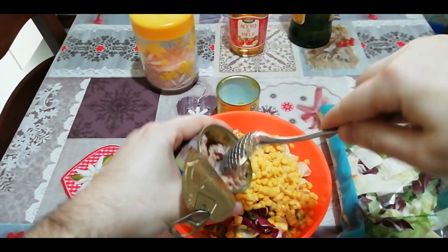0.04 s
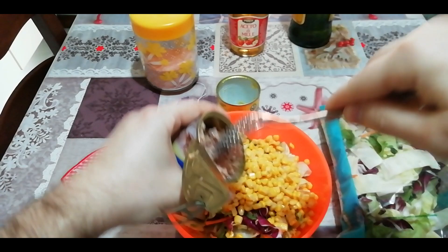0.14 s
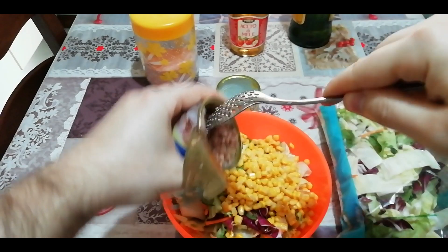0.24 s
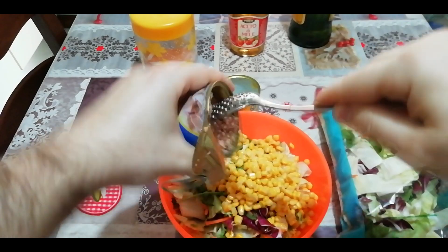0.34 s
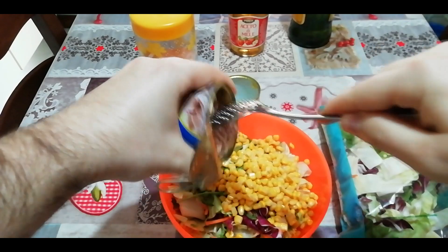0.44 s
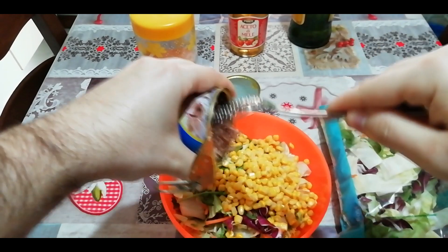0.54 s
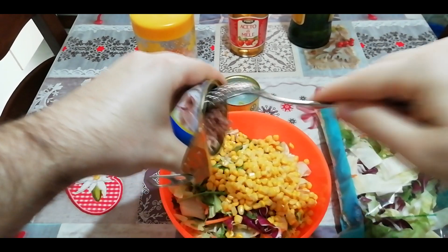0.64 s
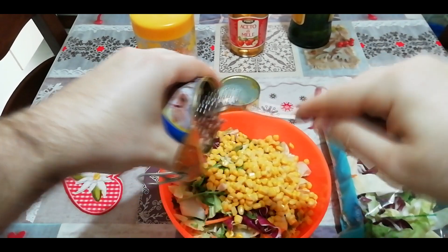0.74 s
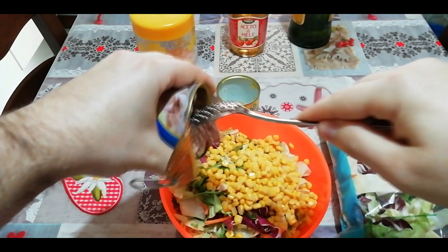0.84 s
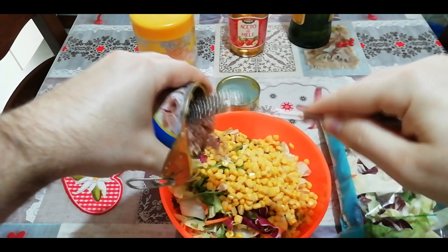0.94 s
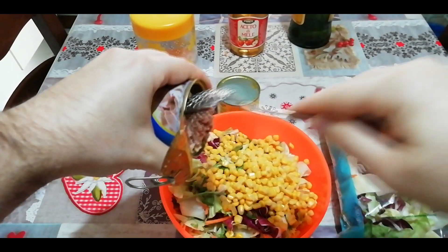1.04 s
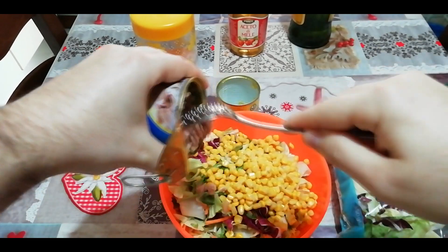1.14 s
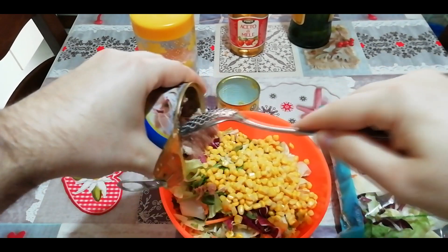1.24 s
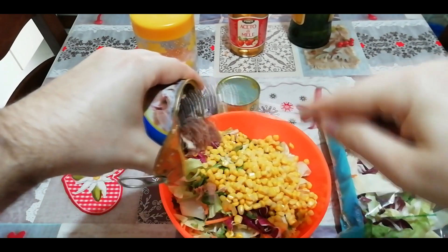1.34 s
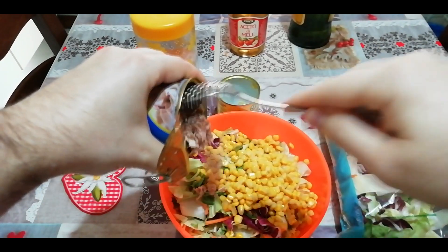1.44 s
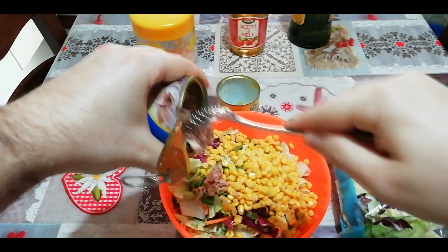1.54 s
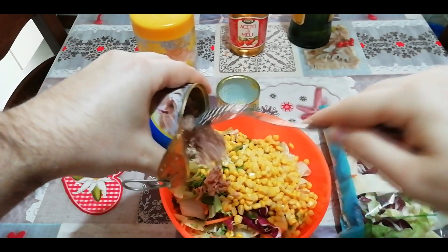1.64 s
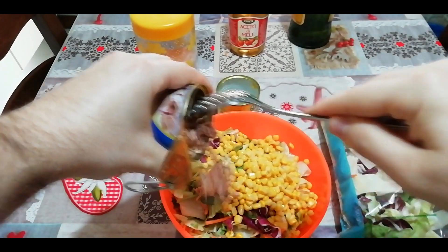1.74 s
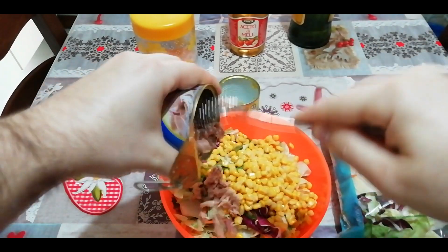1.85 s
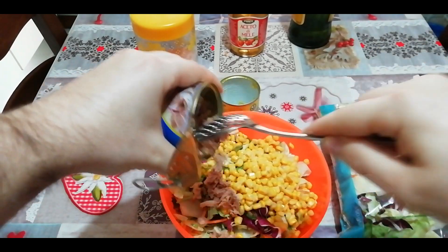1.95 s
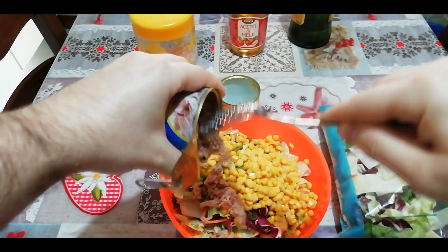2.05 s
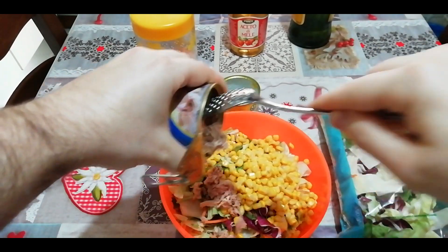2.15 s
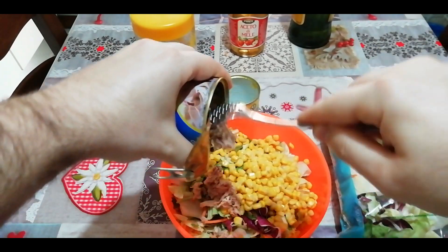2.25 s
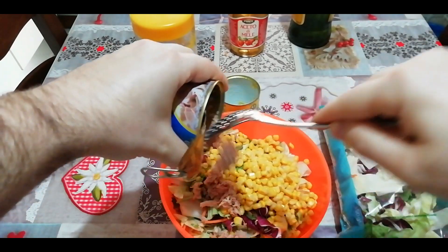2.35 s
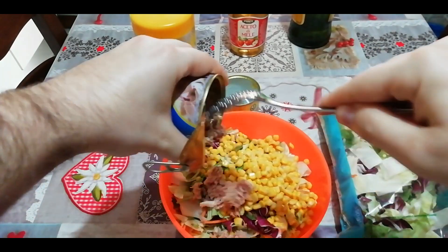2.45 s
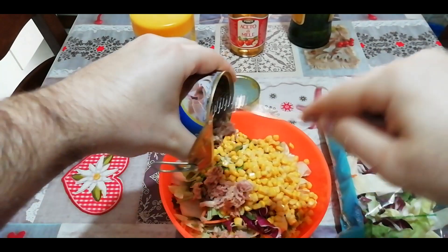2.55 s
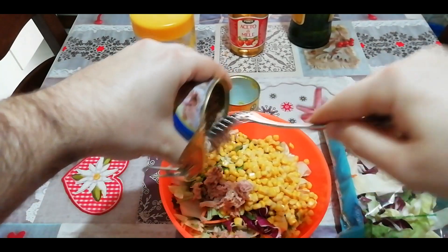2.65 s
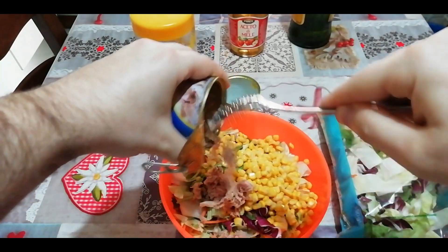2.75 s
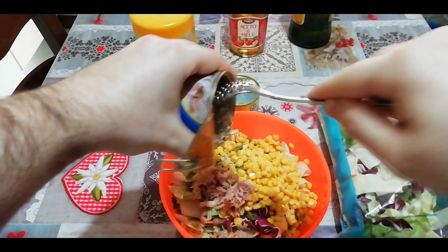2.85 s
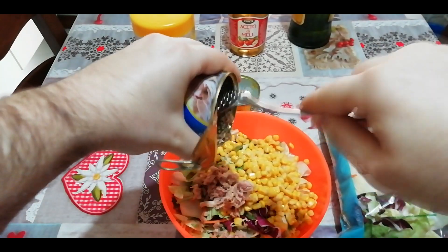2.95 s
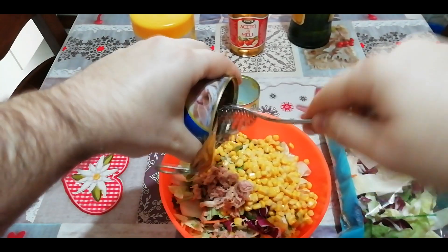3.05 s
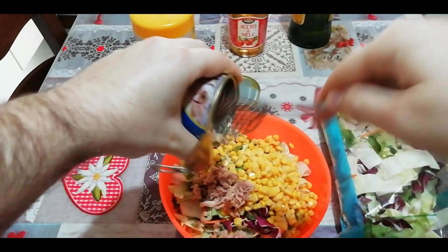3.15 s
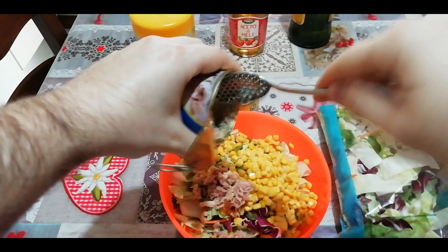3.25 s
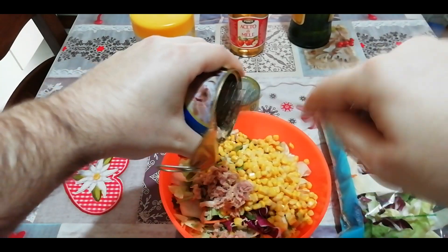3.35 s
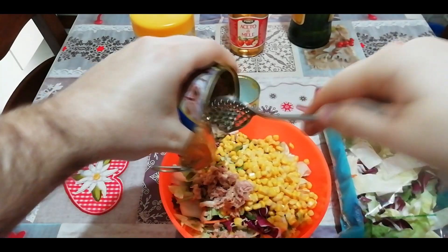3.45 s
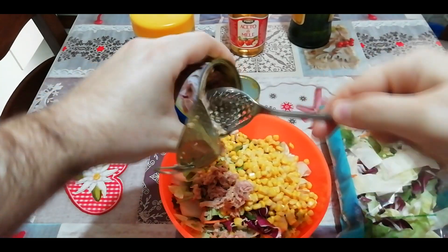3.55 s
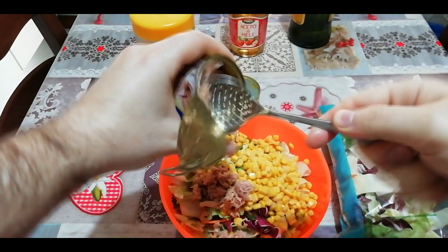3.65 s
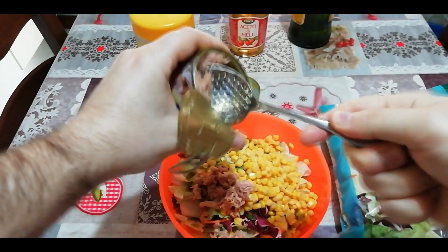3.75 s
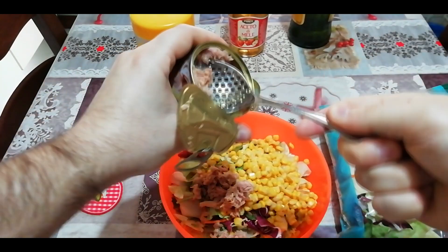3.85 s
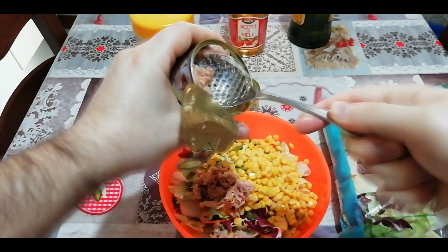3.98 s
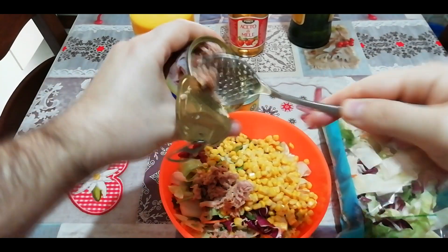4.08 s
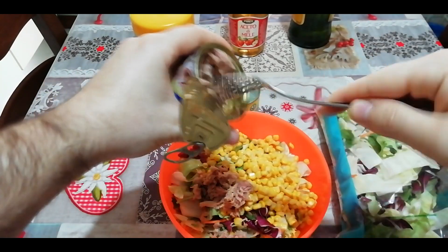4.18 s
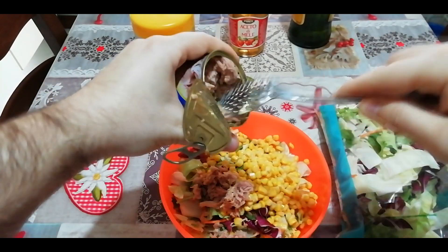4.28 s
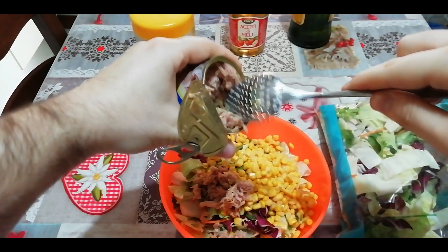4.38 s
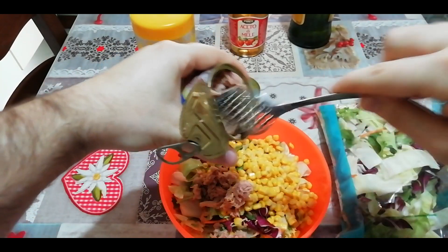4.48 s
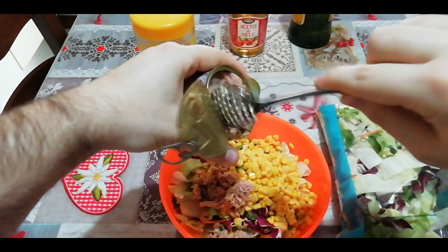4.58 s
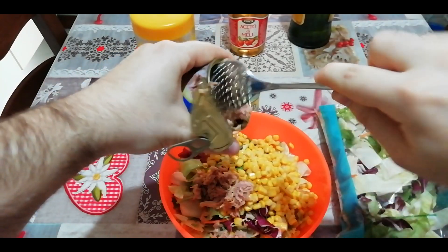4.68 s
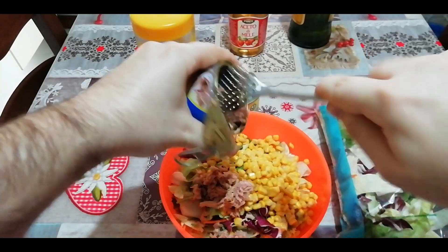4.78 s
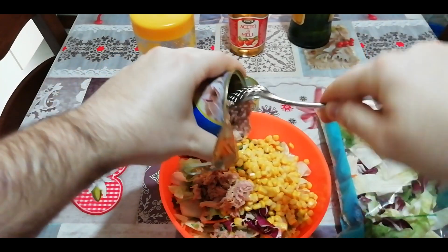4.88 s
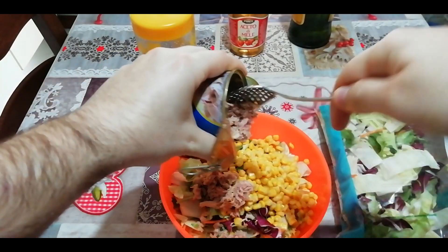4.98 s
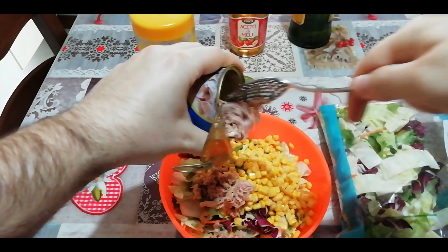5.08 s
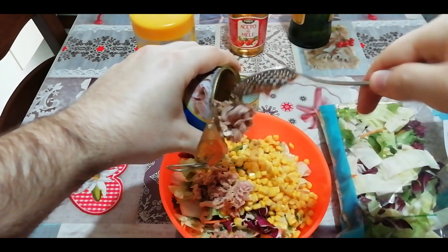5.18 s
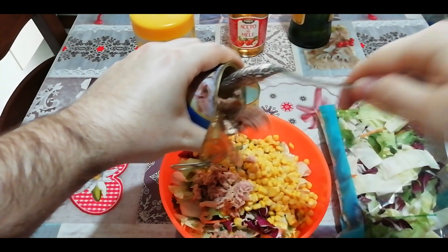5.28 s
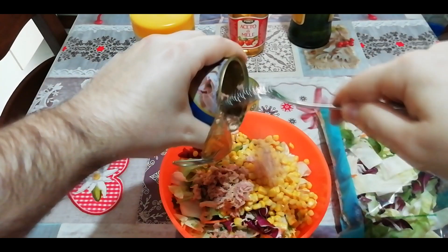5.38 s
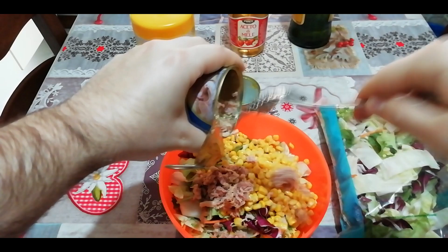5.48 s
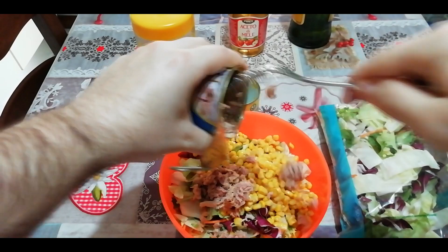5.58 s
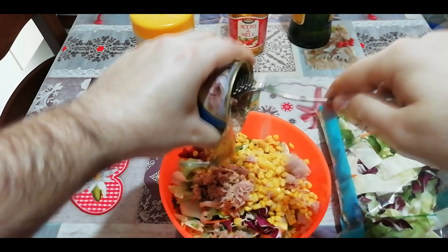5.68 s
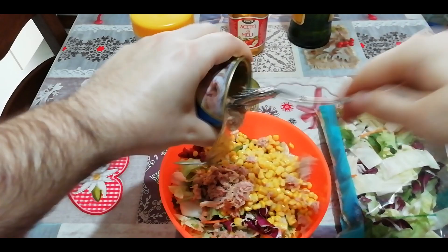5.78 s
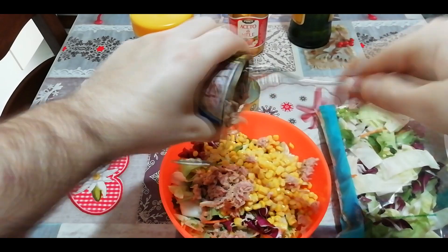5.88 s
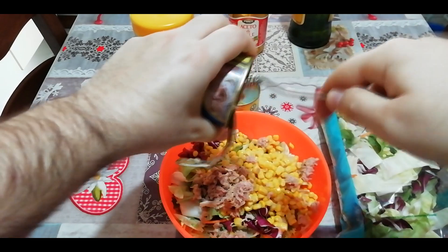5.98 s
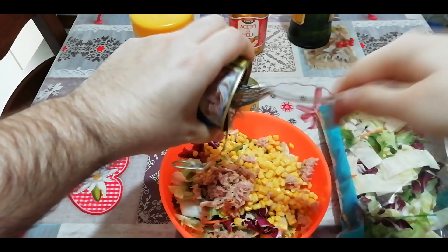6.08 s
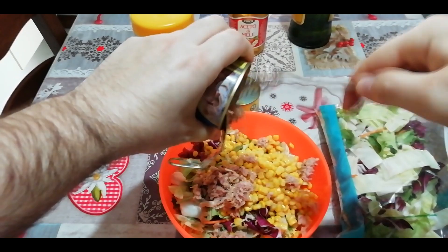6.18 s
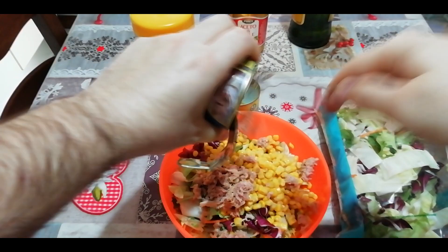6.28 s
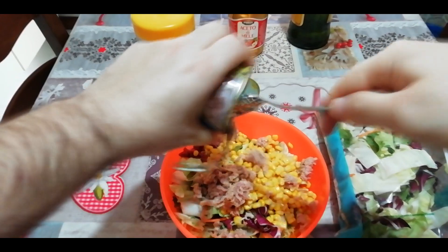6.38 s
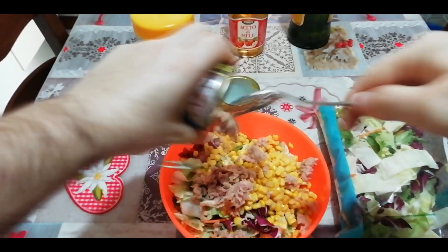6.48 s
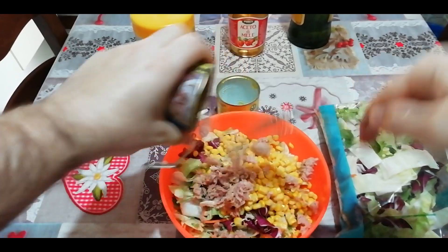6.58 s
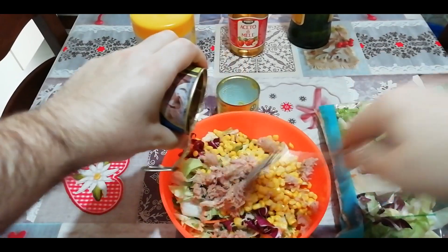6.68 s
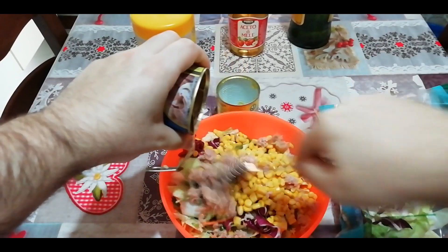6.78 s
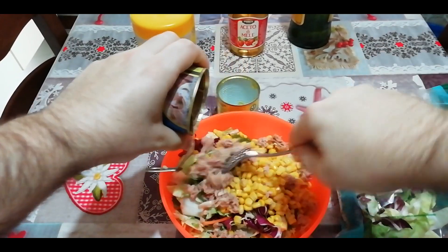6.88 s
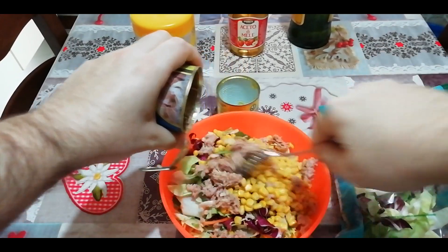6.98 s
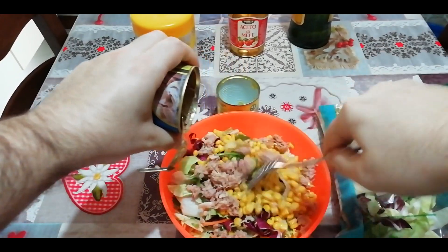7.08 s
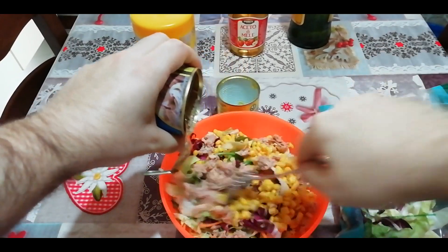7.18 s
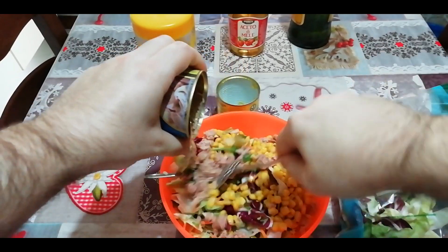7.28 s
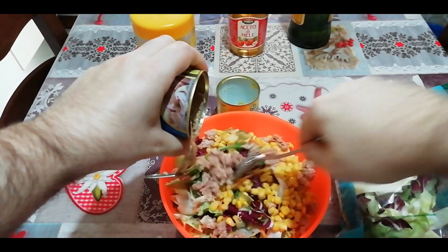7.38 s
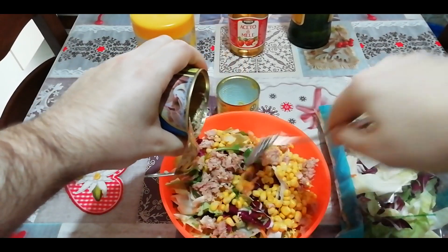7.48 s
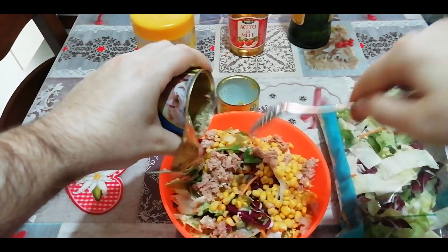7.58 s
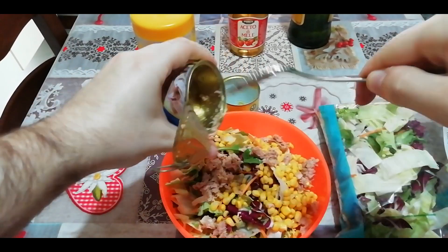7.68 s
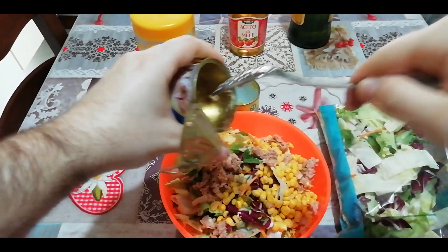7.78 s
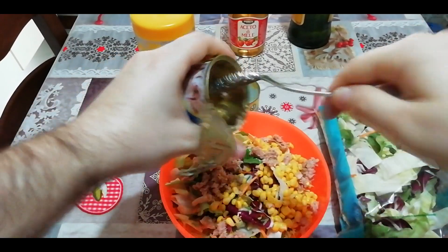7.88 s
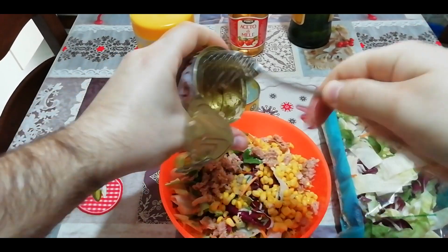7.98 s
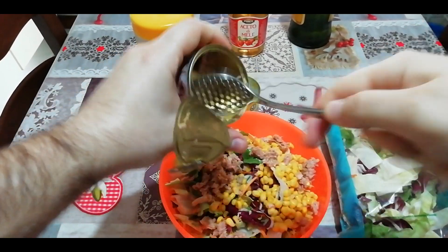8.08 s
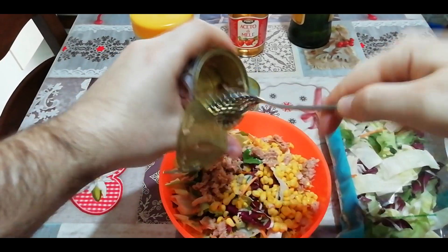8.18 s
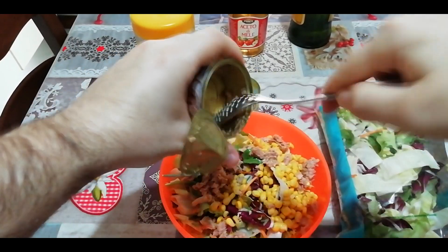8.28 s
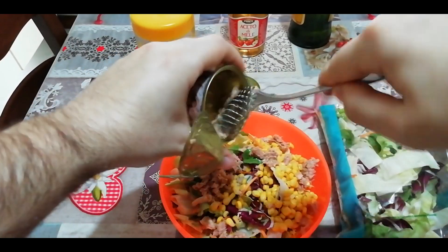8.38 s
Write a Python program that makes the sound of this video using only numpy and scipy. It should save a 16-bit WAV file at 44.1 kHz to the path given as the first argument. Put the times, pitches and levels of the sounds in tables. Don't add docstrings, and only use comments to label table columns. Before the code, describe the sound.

Close stereo pickup in a small, fairly dry kitchen. A metal fork digs oily flaked fish from a hand-held tin: dull knocks and faint wet scratches first, then sharper clinks with gritty scraping and squelching. A hard cluster comes midway, then heavy double blows. The fork briefly stirs softly in a plastic bowl, then returns to the emptier tin with bright, ringing hits. A faint refrigerator hum stays beneath.

```python
import sys
import numpy as np
from scipy import signal
from scipy.fft import rfft, irfft, next_fast_len
from scipy.io import wavfile
from scipy.ndimage import uniform_filter1d

SR = 44100
rng = np.random.default_rng(int(sys.argv[2]) if len(sys.argv) > 2 else 0)


def wav_record(signal):
    frames = np.transpose(np.atleast_2d(signal))
    bounded = np.clip(frames, -1, 1)
    quanta = np.round(bounded * 32767).astype(np.int16)
    wavfile.write(sys.argv[1], SR, quanta)


def boost_factor(decibels):
    exponent = np.asarray(decibels, float) / 20
    return 10 ** exponent


N = 371763
TIME_S = np.arange(N) / SR
OPPOSITE = [[1], [-1]]

# pitch_hz, level_db, t60_s
WALL_MODES = [(970, -31, 0.024), (1210, -21, 0.1), (1390, -9.5, 0.028), (1490, -18, 0.2), (1640, -19, 0.23),
              (1690, -2.5, 0.015), (1750, -13, 0.17), (1817, -12.5, 0.0079), (1951, -14.5, 0.13)]
# pitch_hz, level_db, t60_s
TINE_MODES = [(2740, -17.5, 0.081), (2900, -2, 0.048), (3213, -1, 0.13), (3450, -10, 0.19),
              (3880, -0.5, 0.12), (3900, -0.5, 0.0087), (5300, -4, 0.0032), (5500, -11, 0.077),
              (6000, -5.5, 0.0091), (6100, -6.5, 0.0067), (6850, -5.5, 0.023), (7270, -19.5, .01)]
# start_s, peak_db, wall_hz, tine_hz, sharpness_db (tines re wall)
BLOWS = [(0.421, -22.5, 1339, 6580, -18), (0.784, -27.5, 1140, 5560, -25), (1.555, -20, 1390, 6900, -17),
         (1.895, -32, 1457, 2800, -2), (2.252, -17.5, 1880, 2380, -13), (2.61, -24, 1529, 3000, -5.5),
         (3.001, -25.5, 1750, 5500, -8), (4.138, -31.5, 1750, 3210, -9.5), (4.217, -29.5, 1385, 5790, -21),
         (4.245, -13, 1593, 2810, -12.5), (4.298, -27, 1556, 2708, 5.5), (5.085, -25.5, 1612, 2670, -5.5),
         (5.384, -45, 1666, 3630, 6.5), (5.639, -23, 1596, 4000, -8), (5.669, -13, 1881, 2430, -20.5),
         (5.972, -19.5, 1750, 3330, -18), (5.996, -21, 1690, 3046, -8.5), (6.013, -10, 1904, 2460, -15),
         (6.774, -50.5, 2010, 3800, 6.5), (7.628, -9, 1725, 6850, -18.5), (7.711, -25.5, 1743, 5630, 7),
         (7.858, -38.5, 1220, 3670, 9), (8.281, -29, 1733, 2800, 0.5), (8.395, -13, 1553, 6880, -8)]
# start_s, peak_db, wall_hz, sharpness_db (tines re wall)
FURTHER_BLOWS = [(1.238, -55, 1740, -8), (2.265, -49, 1750, 7), (2.281, -24, 2140, -40), (2.398, -32.5, 1660, -5),
                 (2.794, -50.5, 1390, -4), (2.964, -40.5, 1350, -12.5), (2.98, -46.5, 1390, -6.5),
                 (3.031, -28, 1077, -23.5), (3.309, -41, 1750, -10), (3.511, -61, 1532, -6),
                 (3.903, -37.5, 1630, -9), (3.958, -58, 1590, 1), (4.049, -64.5, 1710, -5),
                 (4.503, -32.5, 1640, -7.5), (5.521, -56.5, 1640, 0), (5.805, -35, 1296, -16.5),
                 (5.844, -43.5, 1220, -7), (5.906, -42.5, 1710, -17), (6.983, -42, 1174, -4.5),
                 (7.042, -45, 1257, -24.5), (8.064, -51, 1740, -23), (8.354, -40, 1230, -26)]
FORK_HZ = 2810
HISS_AT_MEAN_DB = -58


def rms_one(x):
    return x / np.sqrt(np.mean(x ** 2) + 1e-20)


def at_hz(points, hz):
    table = np.array(points)
    return np.interp(np.log(hz + 1), np.log(table[:, 0]), table[:, 1])


def band(x, low_hz, high_hz):
    edges_hz = [low_hz, min(high_hz, .45 * SR)]
    return signal.sosfilt(signal.butter(2, edges_hz, "band", fs=SR, output="sos"), x)


def drift(per_s):
    return np.interp(TIME_S * per_s, np.arange(2000), rng.standard_normal(2000))


def ring(x, hz, t60_s):
    radius = boost_factor(-60 / (t60_s * SR))
    angle = 2 * np.pi * hz / SR
    return signal.lfilter([0, np.sin(angle)], [1, -2 * radius * np.cos(angle), radius * radius], x + 1e-18)


def emptiness(s):
    return np.clip((s - 1.6) / 7.5, 0, 1)


def fork_in_tin(s):
    return (s < 6.4) | (s > 7.3)


def fridge():
    # pitch_hz, rms_db
    hum_partials = [(98, -80), (147, -93.5), (196, -71.5), (245, -102), (294, -85.5), (441, -87.5),
                    (490, -85), (638, -90.5)]
    out = 0
    for hz, level_db in hum_partials:
        wave = np.sin(2 * np.pi * hz * TIME_S + 0.44 * drift(1.5))
        out = out + np.sqrt(2) * boost_factor(level_db + 1.9 * drift(26)) * wave
    return out


def air(spectrum, level_db):
    hz = np.arange(N // 2 + 1) * SR / N
    white = rfft(rng.standard_normal(N))
    return boost_factor(level_db) * rms_one(irfft(white * boost_factor(at_hz(spectrum, hz)), N))


def room_air():
    # pitch_hz, density_db
    middle_spectrum = [(20, -11), (53, -16.5), (95, -7), (150, -17.5), (300, -18), (500, -22.5),
                       (700, -41.5), (1500, -30.5), (4500, -34.5), (6800, -36), (9000, -44), (12500, -31.5),
                       (16000, -41)]
    # pitch_hz, density_db
    side_spectrum = [(20, -15.5), (100, -14.5), (300, -4), (600, -6), (1100, -15), (2100, -21.5),
                     (6000, -14), (7000, -18.5), (9000, -24), (14500, -26), (16000, -33)]
    return air(middle_spectrum, -73) + air(side_spectrum, -74.5) * OPPOSITE


def grit(per_s, size_db):
    sizes = boost_factor(size_db * np.minimum(rng.exponential(1, (3, N)), 4))
    signs = rng.choice([-1, 1], (3, N))
    happens = rng.random((3, N)) < per_s / SR
    shared, *own = sizes * signs * happens
    return rms_one((shared + np.array(own)) * boost_factor(0.42 * np.tanh(drift(130))))


def stroke(s, swell_s, fade_s, earliest_s):
    lift_times = [
        2.95,
        3.46,
        4.77,
        5.96,
        6.24,
        7.08,
    ]
    first = max(int(max(s - 2 * swell_s, earliest_s) * SR), 0)
    on = np.arange(first, min(int((s + 2 * fade_s) * SR), N))
    t = on / SR - s
    lift = min([lift_s - s for lift_s in lift_times if lift_s > s], default=np.inf)
    swing_db = 30
    lift_fade_s = 0.046
    return on, -swing_db * (np.maximum(-t / swell_s, t / fade_s) + np.maximum(t - lift, 0) / lift_fade_s)


def pressure():
    # start_s, wall_db, fade_s, brightness_db (tines re wall)
    skids = [(0.448, -38, 0.096, -10.5), (0.51, -57.5, 0.47, -5.5), (0.809, -35, 0.074, -15),
             (0.871, -65, 0.35, 1.5), (1.566, -46, 0.22, -3), (1.899, -39, 0.14, 0.5),
             (1.975, -57.5, 0.15, 3), (2.262, -33.5, 0.056, -5), (2.29, -63.5, 1, -6),
             (2.619, -32, 0.14, -6), (2.798, -43, 0.083, -2), (3.029, -36, 0.08, -7), (3.425, -46, 0.05, 3),
             (3.777, -42.5, 0.14, -4.5), (3.891, -61.5, 0.11, 13), (4.25, -52.5, 0.088, -4),
             (4.305, -45.5, 0.17, -6.5), (5.091, -53, 0.13, 12), (5.389, -39.5, 0.074, 3.5),
             (5.673, -32.5, 0.067, -1.5), (5.73, -46, 1, -10), (6.025, -35.5, 0.22, -6.5),
             (6.998, -49, 0.095, -14), (7.635, -50, .12, 5.5), (7.715, -41.5, 0.51, 3),
             (7.864, -39, 0.05, 10), (7.93, -77, 0.17, 5), (8.283, -33, 0.059, -5)]
    # peak_s, wall_db, swell_s, fade_s, brightness_db
    sweeps = [(0.1, -70.5, 0.043, 0.37, 6.5), (1.24, -62, 0.057, 0.038, 0),
              (1.642, -56.5, 0.061, 0.14, 5.5), (1.947, -32.5, 0.065, 0.036, -7),
              (2.394, -41.5, 0.044, 0.031, 11.5), (3.088, -35, 0.036, 0.038, -1),
              (3.105, -35.5, 0.032, 0.061, 2), (3.13, -38.5, 0.053, 0.072, 2), (3.2, -44, 0.12, 0.12, -2.5),
              (3.29, -48, 0.18, 0.17, 2.5), (3.38, -42, 0.23, 0.12, -3), (3.836, -43.5, 0.091, 0.062, 8.5),
              (4.181, -46, 0.056, 0.15, 10), (4.384, -36, 0.14, 0.096, 5.5), (4.42, -37.5, 0.076, 0.044, 4),
              (4.498, -43, 0.14, 0.47, 1.5), (4.61, -44.5, 1, 0.049, -8.5), (4.72, -44, 0.46, 0.0485, 0),
              (5.173, -46, 0.19, 0.03, 8), (5.534, -73.5, 0.055, 0.067, 10.5), (6.656, -59, 0.18, 0.3, 6.5),
              (6.716, -52.5, 0.044, 0.078, 6.5), (6.83, -51, 0.18, 0.071, -2.5),
              (6.96, -50.5, 0.28, 0.19, 3), (8.066, -60, 0.019, 0.053, -15),
              (8.355, -35.5, 0.053, 0.026, -8.5)]
    # peak_s, hiss_db, length_s (swell and fade alike)
    squelches = [(0.93, -76, 0.11), (1.34, -69, 0.11), (2.09, -74, 0.1), (2.4, -42.5, 0.039),
                 (2.805, -53.5, 0.081), (3.32, -54, 0.15), (3.801, -52.5, 0.15), (4.84, -73.5, 0.05),
                 (5.15, -45, 0.088), (5.48, -64, 0.12), (6.51, -72, .15), (7.12, -76.5, 0.14),
                 (7.66, -53, 0.1), (7.72, -55, .05), (7.77, -50, .07), (7.84, -51, 0.042),
                 (7.895, -56, .07), (8.1, -62, 0.077)]
    mean_tines_db, hiss_follows, hiss_steeper = -45.5, 1, 1.08
    skid_bite_s = 0.0018
    power = np.zeros((3, N))
    landings = np.array([0] + [row[0] for row in BLOWS + skids])
    strokes = sweeps + [(s, db, skid_bite_s, fade, bright) for s, db, fade, bright in skids]
    for s, wall_db, swell_s, fade_s, bright_db in strokes:
        on, shape_db = stroke(s, swell_s, fade_s, landings[landings < s].max())
        tines_db = wall_db + bright_db
        hiss_db = HISS_AT_MEAN_DB + hiss_follows * (tines_db - mean_tines_db) + hiss_steeper * shape_db
        power[:, on] += boost_factor([wall_db + shape_db, tines_db + shape_db, hiss_db]) ** 2
    for s, hiss_db, length_s in squelches:
        on, shape_db = stroke(s, length_s, length_s, landings[landings < s].max())
        power[2, on] += boost_factor(hiss_db + shape_db) ** 2
    return np.sqrt(power)


def crackle():
    # start_s, end_s
    handling = [
        (0.05, .65),
        (.8, 1.5),
        (1.6, 2.2),
        (2.7, 4.1),
        (4.6, 4.9),
        (5.3, 6.4),
        (6.45, 7.15),
        (8.106, 8.25),
    ]
    moving = sum((TIME_S > start) & (TIME_S < end) for start, end in handling)
    clicks = band(band(grit(per_s=71, size_db=5.0), 3487, 17000), 2600, 17000)
    burst = np.exp(-np.arange(400) / (.0025 * SR)) * rng.standard_normal(400)
    wet = rms_one(signal.fftconvolve(clicks, [burst], axes=1)[:, :N])
    hiss = pressure()[2] / boost_factor(HISS_AT_MEAN_DB) + 0.1
    return moving * boost_factor(-60.5) * hiss ** 0.9 * wet


def tremor(slips, low_hz, high_hz):
    return np.tanh(rms_one(band(slips[0], low_hz, high_hz)))


def held_mode(slips):
    grips = sorted(BLOWS + FURTHER_BLOWS)
    out = np.zeros_like(slips)
    starts = [0] + [round(grip[0] * SR) for grip in grips[1:]] + [N]
    for start, end, grip in zip(starts, starts[1:], grips):
        wall_hz = grip[2] if grip[2] > 1285 else 1720
        out[:, start:end] = ring(slips[:, start:end], wall_hz, 0.016)
    return rms_one(out)


def loosely_held(t):
    # start_s, end_s, level_db (re tines)
    singing_spans = [
        (1.896, 2.1, 0.5),
        (3.81, 3.92, -5),
        (4.329, 4.46, -7.5),
        (4.479, 4.561, -4.5),
        (5.707, 5.794, 5),
        (8.28, 8.348, 2.5),
    ]
    return sum(boost_factor(db) * ((t > start) & (t < end)) for start, end, db in singing_spans)


def rasp(slips):
    rasp_edges = [2400, 3000, 3750, 4700, 5850, 7300]
    out = 0
    for k, (low_hz, high_hz) in enumerate(zip(rasp_edges, rasp_edges[1:])):
        out = out + boost_factor(6 * drift(35)) * (-1) ** k * band(slips, low_hz, high_hz)
    return rms_one(out)


def wandering_modes(slips, modes, damping):
    out = 0
    for k, (hz, level_db, t60_s) in enumerate(modes):
        out = out + boost_factor(level_db + 6.7 * drift(22)) * (-1) ** k * rms_one(ring(slips, hz, damping * t60_s))
    return rms_one(out)


def drag():
    wall, tines, hiss = pressure()
    in_tin = fork_in_tin(TIME_S)
    empty = emptiness(TIME_S)
    tipped = (TIME_S > 5.0) & (TIME_S < 6.35)
    slips = grit(per_s=2500, size_db=4.0) + 0.89 * grit(per_s=210, size_db=2.0)
    out = hiss * boost_factor(3.5) * rms_one(band(slips, 10920, 15000))
    out += in_tin * wall * boost_factor(-8.0) * wandering_modes(slips, WALL_MODES, .15)
    out += in_tin * tines * boost_factor(-8.0) * wandering_modes(slips, TINE_MODES, .12)
    out += in_tin * wall * boost_factor(-13.5 + 8.2 * tremor(slips, 8.4, 20)) * (0.34 + empty) * held_mode(slips)
    singing = loosely_held(TIME_S) * boost_factor(-8 + 4.0 * tremor(slips, 8, 25))
    out += tines * singing * rms_one(ring(slips, FORK_HZ, .035))
    out += in_tin * wall * boost_factor(-11.5) * (1 - empty) ** 4 * rms_one(band(slips, 1200, 2700))
    out += tines * boost_factor(np.where(in_tin, -5, -5.5)) * rasp(slips)
    out += ~in_tin * wall * boost_factor(-8.5) * rms_one(band(slips, 740, 2600))
    food = rms_one(band(slips, 240.0, 940))
    return out + wall * boost_factor(-21.5 + 6.5 * tipped) * food


def contacts():
    # start_s, peak_db
    touches = [(0.107, -59), (0.221, -60.5), (0.979, -63), (1.015, -67), (1.169, -62.5), (1.329, -63.5),
               (1.688, -53.5), (2.084, -78), (3.604, -64.5), (3.684, -68), (4.845, -70), (6.5, -75),
               (6.553, -65), (6.586, -66), (6.613, -62), (6.85, -70), (8.111, -60.5), (8.207, -79)]
    tick_below_db = 6
    further_tine_hz = 2800
    touch_wall_hz, touch_tine_hz, touch_sharp_db, touch_tick_below_db = 1513, 6740, 1, 2.5
    rows = [(*blow, blow[-1] - tick_below_db) for blow in BLOWS]
    rows += [(s, db, hz, further_tine_hz, sharp, sharp - tick_below_db) for s, db, hz, sharp in FURTHER_BLOWS]
    rows += [(s, db, touch_wall_hz, touch_tine_hz, touch_sharp_db, touch_sharp_db - touch_tick_below_db)
             for s, db in touches]
    return sorted(rows)


def struck(t, modes, free, bend=.02):
    hz, level_db, t60_s = np.transpose(modes)[:, :, None]
    strength, grip, left, right = np.tanh(rng.standard_normal((4, len(modes), 1)))
    decay = boost_factor(level_db + 4 * strength - 60 * t / (free * t60_s))
    rings = decay * np.sin(2 * np.pi * hz * (1 + bend * grip) * t)
    sides = [np.sum(rings * boost_factor(4 * side), axis=0) for side in (left, right)]
    return np.array(sides) / len(modes) ** .5


def knocks():
    # pitch_hz, level_db, t60_s
    thud_modes = [(320, -36.5, 0.047), (464, -23, 0.026)]
    base_hz = 832
    out, t = np.zeros((2, N + 6000)), np.arange(6000) / SR
    rise = 1 - np.exp(-t / 0.0012)
    for s, peak_db, wall_hz, tine_hz, tine_db, tick_db in contacts():
        empty = emptiness(s) * fork_in_tin(s)
        free = .3 + .5 * empty
        noise = rng.standard_normal(len(t)) + 1.67 * rng.standard_normal((2, len(t)))
        short = boost_factor(-60 * t / 0.012)
        favoured = np.sin(2 * np.pi * wall_hz * t) * (short + 0.39 * empty ** 2 * boost_factor(-60 * t / 0.044))
        flex = boost_factor(-11.5 + 0.58 * (peak_db + 10.0) - 60 * t / 0.046)
        base = np.sin(2 * np.pi * base_hz * t) * empty ** 4 * flex
        packed = 1.19 * (1 - 0.96 * empty) * band(noise * short, 1000, 2400)
        wall = 1.06 * favoured + base + packed + 0.39 * struck(t, WALL_MODES, free)
        tines = 5.14 * np.sin(2 * np.pi * tine_hz * t) * boost_factor(-60 * t / 0.0079)
        tines = tines + 1.5 * struck(t, TINE_MODES, free, bend=0.0024)
        crack = 2.18 * band(noise * boost_factor(-60 * t / 0.016), 2800, 7780)
        tick = 2.56 * band(noise * boost_factor(-60 * t / 0.014), 6100, 17240)
        blow = rise * (wall + struck(t, thud_modes, free))
        blow = blow + boost_factor(tine_db) * (np.sqrt(rise) * tines + crack) + boost_factor(tick_db) * tick
        at = round(s * SR)
        out[:, at:at + len(t)] += boost_factor(peak_db) * blow
    return out[:, :N]


def partials(rows):
    out = np.zeros(N)
    for s, hz, peak_db, t60_s in rows:
        at = round(s * SR)
        t = np.arange(min(SR // 3, N - at)) / SR
        envelope = boost_factor(peak_db - 60 * t / t60_s) * (1 - np.exp(-t / .0005))
        out[at:at + len(t)] += envelope * np.sin(2 * np.pi * hz * t)
    return out


def clangs():
    # start_s, pitch_hz, peak_db, t60_s
    clear_partials = [(1.9, 740, -50, 0.049), (2.252, 1967, -34, 0.048), (2.281, 755, -38.5, 0.04),
                      (2.252, 3840, -33, 0.036), (2.377, 7000, -37, .05), (2.61, 2250, -30, 0.021),
                      (2.61, 6860, -39, 0.088), (3.031, 1530, -32, 0.013), (3.087, 1320, -36.5, 0.034),
                      (3.1, 1400, -40.5, 0.047), (3.322, 1756, -43, 0.054), (3.369, 1683, -38, 0.087),
                      (4.217, 6360, -28, 0.013), (4.2168, 1300, -10.5, 0.0045), (4.246, 6800, -32, 0.032),
                      (4.298, 6770, -21, 0.021), (4.385, 6650, -29.5, 0.033), (4.6, 1030, -40, 0.012),
                      (4.687, 1643, -44, 0.042), (5.639, 2040, -43, 0.056), (5.639, 400, -49, 0.033),
                      (5.669, 710, -34.5, 0.031), (5.669, 2430, -33, 0.054), (5.972, 603, -40, 0.055),
                      (5.972, 3880, -39, 0.074), (5.985, 6720, -42.5, 0.07), (6.014, 1907, -24, 0.032),
                      (6.014, 6390, -25, 0.019), (6.014, 2580, -27, 0.046), (6.025, 3430, -30.5, 0.051),
                      (6.04, 446, -40.5, 0.034), (7.627, 5500, -23.5, 0.02), (7.645, 5500, -40, .12),
                      (7.628, 1317, -19.5, 0.051), (7.711, 7000, -25, .04), (7.711, 1724, -40.5, .08),
                      (7.711, 586, -37, 0.033), (7.858, 6100, -12, .005), (7.859, 7150, -33, 0.025),
                      (7.859, 1336, -37.5, 0.044), (7.859, 570, -39, 0.029), (8.058, 1740, -46, 0.064),
                      (8.066, 1760, -49.5, 0.067), (8.281, 1785, -29.5, 0.029), (8.281, 6910, -35.5, 0.056),
                      (8.395, 1562, -30, 0.15), (8.395, 3870, -26, 0.06), (8.4, 6080, -26, 0.057),
                      (8.395, 6850, -39, 0.067), (8.395, 814, -29, 0.13)]
    # start_s, peak_db
    fork_notes = [(1.896, -32), (2.397, -35), (2.612, -41), (3.002, -38), (4.217, -36.5), (4.245, -22.5),
                  (4.299, -31), (4.379, -27.5), (4.411, -27), (4.501, -30), (5.086, -51), (5.39, -40),
                  (5.64, -38.5), (5.677, -38), (5.98, -31), (7.712, -21), (8.282, -27.5)]
    # start_s, pitch_hz, peak_db
    small_ticks = [(0.165, 7150, -48), (0.209, 3940, -56), (0.335, 1090, -52), (0.541, 5500, -47),
                   (0.574, 6640, -46), (0.603, 5500, -44), (1.219, 2620, -45), (1.239, 3220, -60),
                   (1.459, 7070, -51), (1.72, 6960, -40), (1.791, 6170, -48), (3.279, 3450, -46),
                   (3.965, 5500, -56), (4.503, 5600, -42), (4.664, 6500, -42), (4.687, 3220, -37.5),
                   (6.613, 3010, -46), (6.641, 2900, -62), (6.65, 6300, -45), (6.672, 3000, -56),
                   (6.672, 1320, -49), (6.708, 2940, -51), (6.821, 1280, -43), (6.849, 4880, -35),
                   (6.881, 4660, -36), (6.926, 6030, -35), (6.945, 6550, -47), (6.95, 1310, -48),
                   (6.981, 3030, -47), (7.041, 2500, -45), (7.094, 1097, -58.5), (8.354, 1380, -32.5),
                   (0.93, 6500, -62), (0.95, 7050, -54), (1.345, 5500, -60), (8.117, 7100, -39),
                   (8.06, 6970, -50)]
    # start_s, pitch_hz, peak_db
    rim_glints = [(2.61, 13900, -39), (3.001, 14870, -46), (4.216, 13280, -42.5), (4.246, 13200, -31),
                  (4.298, 14900, -35.5), (5.384, 13050, -49), (5.64, 13440, -35), (5.98, 14780, -46.5),
                  (7.628, 13500, -34.5), (7.711, 14850, -34), (7.711, 11900, -30.5), (7.711, 13700, -37),
                  (7.859, 13190, -44)]
    # start_s, pitch_hz, peak_db, t60_s
    opposite_rings = [(0.421, 2900, -34.5, 0.013), (1.225, 2730, -60, 0.043), (1.245, 3230, -62, .05),
                      (4.138, 3180, -29.5, 0.015), (4.246, 3560, -14.5, 0.014), (4.246, 3900, -22, 0.015),
                      (5.085, 3850, -33, .02), (5.384, 4250, -49.5, 0.033), (6.775, 3930, -37.5, .014),
                      (7.711, 3150, -24.5, 0.014), (7.711, 4030, -18.5, 0.019), (7.859, 3440, -26, 0.031),
                      (8.281, 3760, -21.5, 0.016), (8.281, 4280, -25, 0.019), (8.395, 3140, -25, 0.027),
                      (8.395, 3500, -22, 0.031)]
    fork_t60_s, tick_t60_s, glint_t60_s = 0.074, .008, 0.028
    rows = clear_partials + [(s, FORK_HZ, db, fork_t60_s) for s, db in fork_notes]
    rows += [(s, hz, db, tick_t60_s) for s, hz, db in small_ticks]
    rows += [(s, hz, db, glint_t60_s) for s, hz, db in rim_glints]
    return partials(rows) + partials(opposite_rings) * OPPOSITE


def snaps():
    # start_s, peak_db
    edge_snaps = [(2.2526, -27), (2.61, -21.5), (3.9335, -49), (3.9514, -49), (3.9624, -51), (3.9704, -47),
                  (4.0472, -45), (4.2163, -25.5), (4.2448, -20.5), (4.2993, -17), (5.0848, -44),
                  (5.8344, -46), (5.8424, -41), (5.9994, -23.5), (7.6276, -13), (7.7086, -15.5),
                  (7.8414, -37), (7.8576, -22), (8.281, -23), (8.394, -16)]
    out, t = np.zeros((2, N + SR)), np.arange(600) / SR
    noise = rng.standard_normal((len(edge_snaps), 3, len(t)))
    for (s, peak_db), (shared, *own) in zip(edge_snaps, noise):
        at = round(s * SR) + SR // 1000
        decay = boost_factor(peak_db - 1.5 - 60 * t / .004)
        out[:, at:at + len(t)] += decay * (shared + .6 * np.array(own))
    return band(out[:, :N], 4000, 17500)


def bumps():
    # start_s, peak_db
    jolts = [
        (3.121, -68),
        (4.249, -62.5),
        (5.669, -58),
        (5.808, -60),
        (6.021, -58),
        (7.63, -56),
    ]
    out = np.zeros(N)
    for s, peak_db in jolts:
        out[round(s * SR)] = boost_factor(peak_db + 3.0)
    return ring(out, 75, 0.084) + ring(out, 130, 0.091)


def flexes():
    # start_s, pitch_hz, peak_db, t60_s
    wall_flexes = [
        (4.2, 1530, -44, .03),
        (3.796, 1700, -41, .04),
        (3.822, 1470, -39, .07),
        (3.783, 430, -52, .07),
        (3.808, 380, -50.5, .1),
    ]
    return partials(wall_flexes)


def gap(x):
    centre_hz, half_width_hz, depth_db = 2260, 150, -14
    open_tin = uniform_filter1d(1. * ((emptiness(TIME_S) > 0) & fork_in_tin(TIME_S)), size=SR // 20)
    edges_hz = [centre_hz - half_width_hz, centre_hz + half_width_hz]
    between = signal.sosfilt(signal.butter(1, edges_hz, "band", fs=SR, output="sos"), x)
    return x - open_tin * (1 - boost_factor(depth_db)) * between


def kitchen(x):
    # pitch_hz, t60_s
    room_decay = [(250, 0.42), (700, 0.43), (1500, 0.34), (3000, 0.3), (6000, 0.27), (12000, 0.15)]
    t = np.arange(SR // 2) / SR
    white = rng.standard_normal((2, len(t)))
    tail = sum(band(white, hz / 1.84, hz * 1.48) * boost_factor(-60 * t / t60_s) for hz, t60_s in room_decay)
    tail = tail * np.clip((t - .003) / 0.0029, 0, 1)
    return signal.fftconvolve(x, tail / np.sqrt(np.sum(tail ** 2) / 2), axes=1)[:, :N]


def ports(x):
    # pitch_hz, level_db
    left_colour = [(100, 2.5), (700, 1.5), (1300, 7), (1950, 4), (2300, 8.5), (2700, 4.5), (4400, 1.5),
                   (7000, -5.5), (8200, -0.5), (10000, 5.5), (13000, 0.5), (14800, 7), (15800, -8.5),
                   (17000, -27)]
    # pitch_hz, level_db
    right_colour = [(100, 2.5), (700, 1), (1300, 6), (1950, 9), (2300, 7), (2700, 6), (4400, -0.5),
                    (7000, 4.5), (8200, 2), (10000, 2.5), (13000, -10), (14800, -9), (15800, -27),
                    (17000, -35)]
    right_lag_s = .00015
    size = next_fast_len(N + 2000)
    hz = np.arange(size // 2 + 1) * SR / size
    left = boost_factor(at_hz(left_colour, hz))
    right = boost_factor(at_hz(right_colour, hz)) * np.exp(-2j * np.pi * hz * right_lag_s)
    return irfft(rfft(x, size) * [left, right], size)[:, :N]


def scene():
    metal = gap(knocks() + drag()) + clangs() + flexes()
    tin = band(metal, 260, 19000)
    background = fridge() + room_air()
    return tin + boost_factor(-8.0) * gap(kitchen(tin)) + bumps() + background + crackle() + snaps()


def top_cut(x):
    return signal.sosfilt(signal.butter(12, 16800, fs=SR, output="sos"), x)


def record(dry):
    return top_cut(ports(dry))


dry = scene()
out = record(dry)
wav_record(out)
```